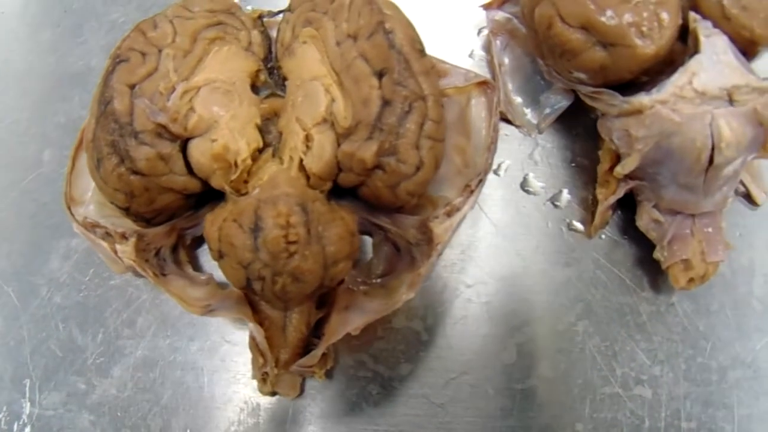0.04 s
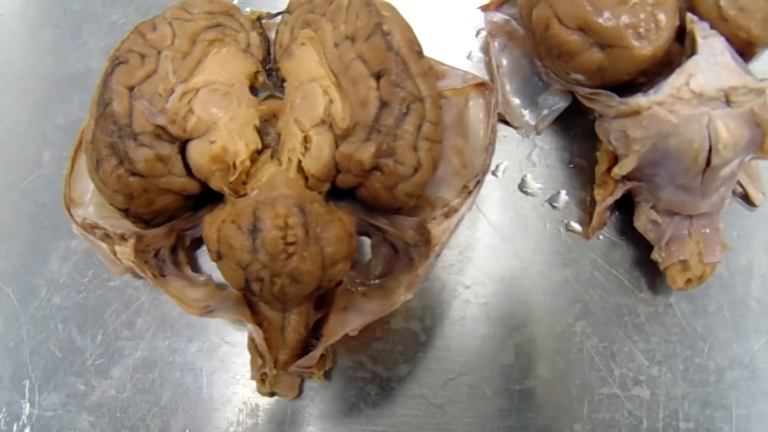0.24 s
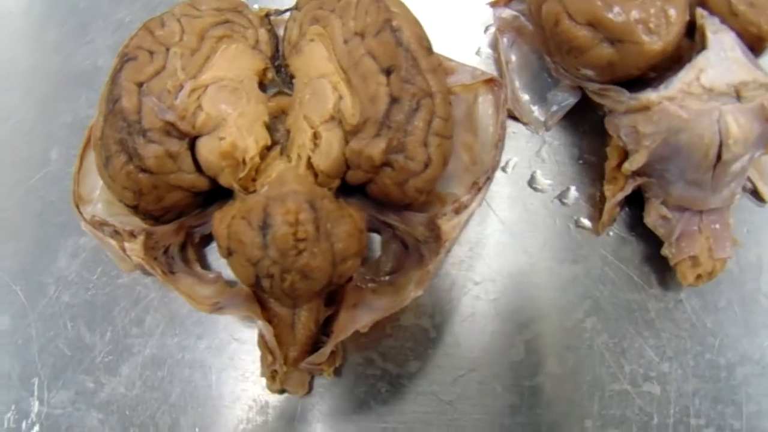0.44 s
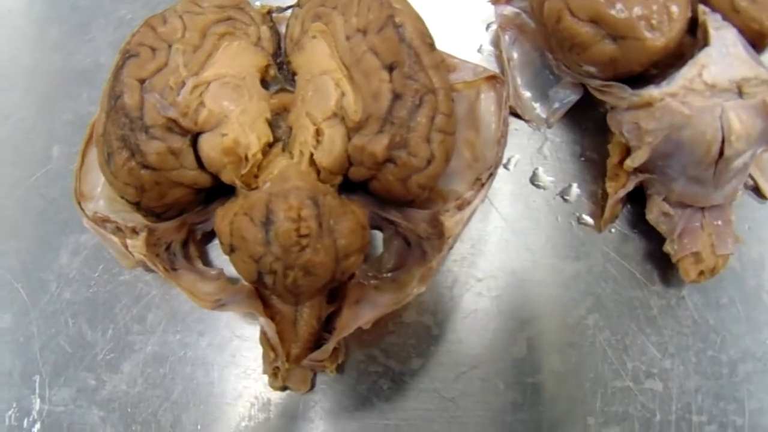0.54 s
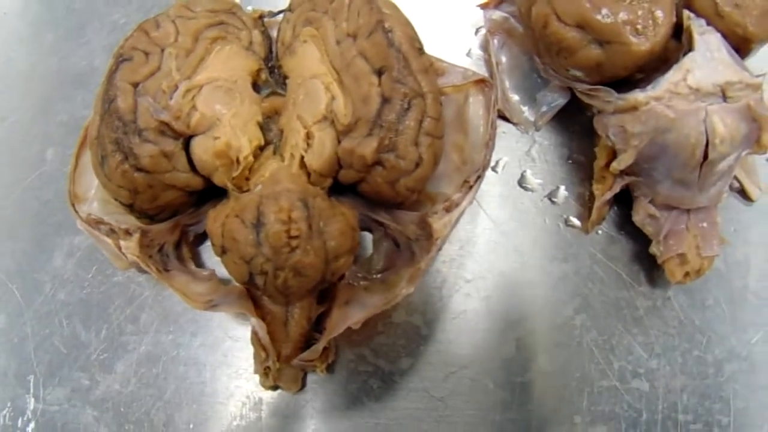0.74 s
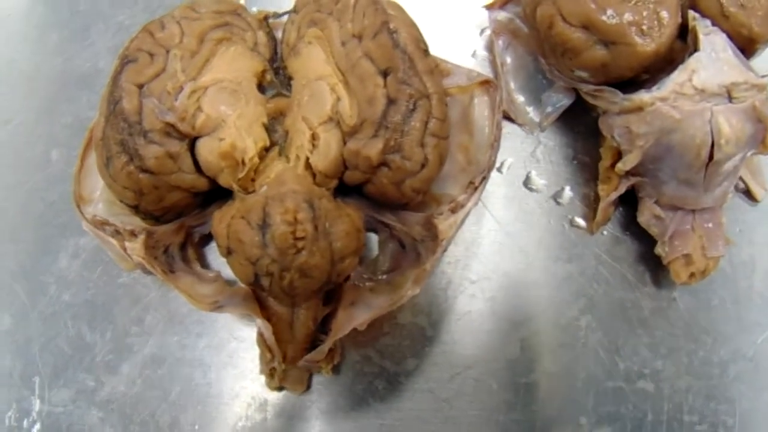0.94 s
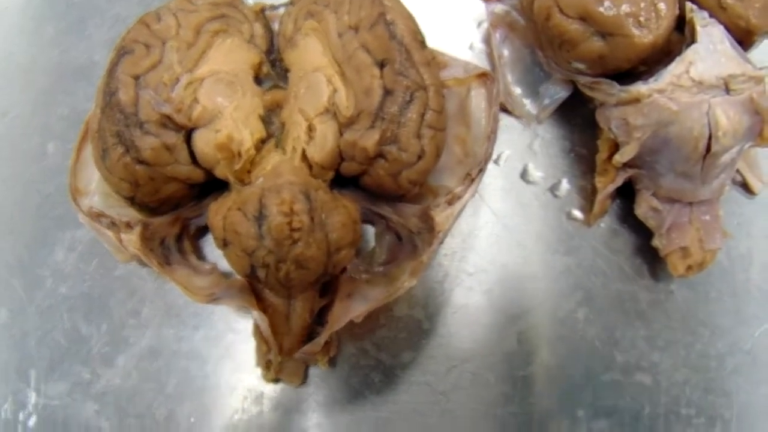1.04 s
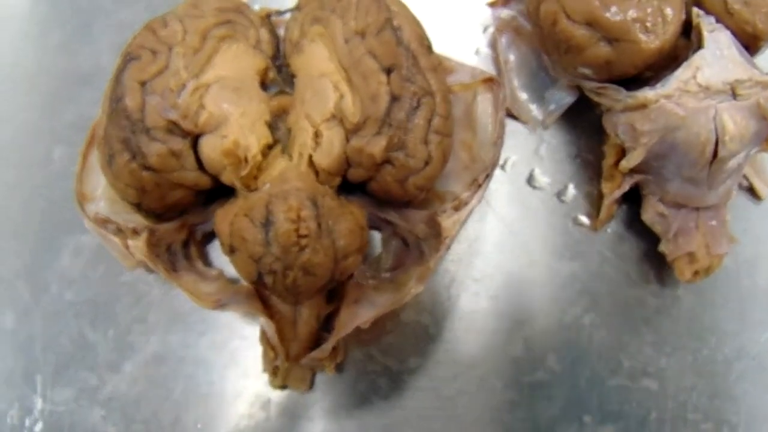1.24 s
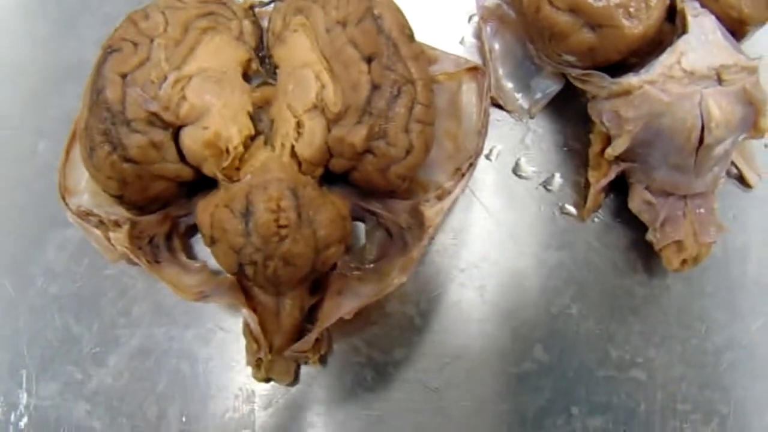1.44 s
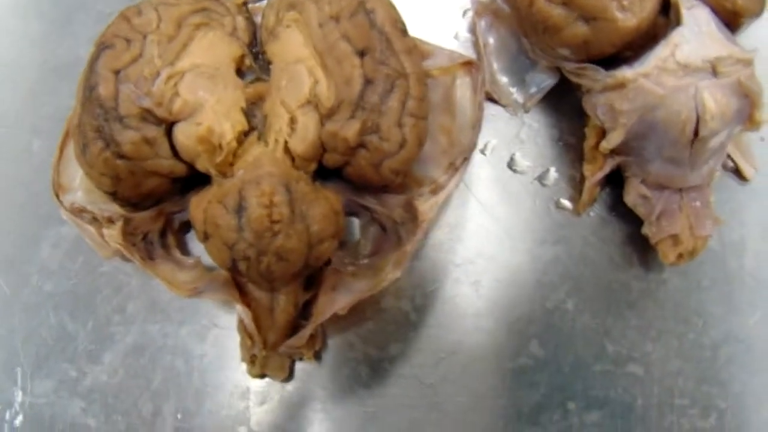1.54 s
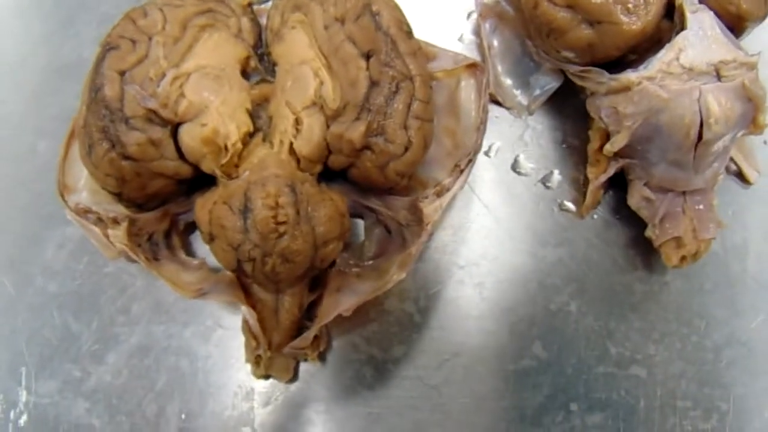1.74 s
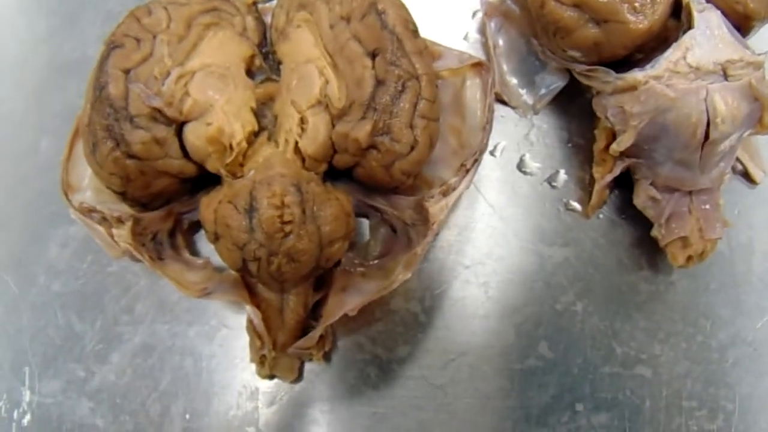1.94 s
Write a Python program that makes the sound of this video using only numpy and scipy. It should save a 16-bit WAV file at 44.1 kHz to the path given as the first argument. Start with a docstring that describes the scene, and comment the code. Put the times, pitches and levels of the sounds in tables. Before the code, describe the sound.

A small steel tool lands on a metal tray at about 0.2 seconds with one sharp clink, ringing high over a damped clank and rattling briefly. A dull knock follows at 0.4 seconds as the ring fades. Faint wet ticks and rubbing of handled tissue come around 0.8 to 1.6 seconds. A low ventilation hum fills the quiet lab room throughout the two seconds.

```python
"""Steel tool set down on a tray.

A small tool lands on a loaded metal tray in a lab: one sharp clink, a brief rattle, a dull knock.
The tool rings at two high pitches, the damped tray clanks below it and the room answers.
Faint wet ticks and rubbing follow as soft tissue is handled, over the hum of ventilation."""
import sys
import numpy as np
from scipy import signal
from scipy.fft import rfft, irfft
from scipy.io import wavfile

SR = 44100
rng = np.random.default_rng(int(sys.argv[2]) if len(sys.argv) > 2 else 0)


def waveform_to_disk(signal):
    """Save audio, clipped to [-1, 1], as 16-bit WAV at the path in sys.argv[1]."""
    frames = np.transpose(np.atleast_2d(signal))
    scaled = np.clip(frames, -1, 1) * 32767
    samples = np.round(scaled).astype(np.int16)
    wavfile.write(sys.argv[1], SR, samples)


N = 88200


def undb(db):
    """Decibels to gain."""
    return 10 ** (np.asarray(db) / 20)


def unit(x):
    """Scale to rms 1."""
    return x / np.sqrt(np.mean(x ** 2))


def clock():
    """Sample times in s."""
    return np.arange(N) / SR


def colour(x, points, tilt_db_oct=0):
    """Filter by (f/Hz, level/dB) points and a tilt."""
    hz, db = np.array(points, float).T
    octave = np.log2(np.maximum(np.fft.rfftfreq(N, 1 / SR), 1))
    gain_db = np.interp(octave, np.log2(hz), db) + tilt_db_oct * octave
    return irfft(rfft(x) * undb(gain_db), N)


def noise(points, tilt_db_oct=0):
    """Coloured noise of rms 1."""
    return unit(colour(rng.standard_normal(N), points, tilt_db_oct))


def fade(t60_s):
    """Exponential decay."""
    return np.exp(-np.log(1000) * clock() / max(t60_s, 1 / SR))


def rise(tau_s):
    """Exponential onset."""
    return 1 - np.exp(-clock() / tau_s)


def at(x, start_s):
    """Delay a sound to its start time."""
    return np.concatenate([np.zeros(int(start_s * SR)), x])[:N]


def ring(modes):
    """Decaying modes that start together from rest."""
    return sum(undb(db) * np.sin(2 * np.pi * hz * clock()) * fade(t60_s) for hz, db, t60_s in modes)


# air rush spectrum: f/Hz, level/dB
AIR_SPECTRUM = [(12, -57), (20, -10.5), (85, -12.5), (112, -12.5), (140, -6), (286, -15.5), (443, -22),
                (706, -23.5), (787, -25), (928, -27), (1010, -27.5), (1090, -25.5), (1890, -35.5),
                (9030, -42.5), (14000, -43)]
# fan tones: f/Hz, width/Hz, level/dB
FAN_TONES = [(181.2, 11, -49), (239.6, 3.8, -55.5), (785, 4.2, -61.5), (859, 17, -67.5), (997, 13, -65)]


def ventilation(air_db=-44.5, steady_db=0.5, waver_db=-6.5):
    """Wavering fan tones over a steady rush of air."""
    out = undb(air_db) * noise(AIR_SPECTRUM)
    bins_hz = np.fft.rfftfreq(N, 1 / SR)
    for hz, width_hz, db in FAN_TONES:
        peak = 1 / (1 + ((bins_hz - hz) / width_hz) ** 2)
        waver = unit(irfft(rfft(rng.standard_normal(N)) * peak, N))
        steady = unit(np.sin(2 * np.pi * (hz * clock() + rng.random())))
        out += undb(db) * (undb(steady_db) * steady + undb(waver_db) * waver)
    return out


# main hum envelope: t/s, level/dB
HUM_ENVELOPE = [(0.0, -37.5), (0.08, -36.5), (0.1, -43), (0.26, -36.5), (0.32, -34), (0.36, -63),
                (0.38, -38), (0.43, -33.5), (0.48, -43.5), (0.67, -36), (0.9, -45.5), (0.93, -35.5),
                (1.1, -34.5), (1.15, -42), (1.2, -35.5), (1.24, -42.5), (1.36, -36), (1.4, -44.5),
                (1.45, -33.5), (1.49, -43.5), (1.57, -38), (1.64, -45.5), (1.74, -35), (1.84, -43),
                (1.89, -31.5), (1.94, -47), (1.97, -34), (2.0, -36.5)]


def hum(centre_hz=139.5, wander_hz=0.81, gain_db=-1):
    """The main hum swells and sinks while its pitch wanders slightly."""
    hz = centre_hz + wander_hz * noise([(4, 0), (16, -40), (100, -120)])
    tone = unit(np.sin(2 * np.pi * np.cumsum(hz) / SR))
    times_s, db = np.array(HUM_ENVELOPE).T
    return undb(gain_db + np.interp(clock(), times_s, db)) * tone


# wet ticks: t/s, level/dB, tilt/(dB/oct)
WET_TICKS = [(0.7703, -43, 2), (0.7836, -47.5, 0), (0.7930, -50, -2), (0.894, -47, 4), (0.9100, -36.5, -2),
             (0.9210, -48, 11), (1.4659, -34.5, 1), (1.5346, -45, 1), (1.559, -50, 3)]
# wet tick spectrum: f/Hz, level/dB
WET_SPECTRUM = [(300, -20), (1800, -13), (2300, -5), (2900, 10.5), (3600, -13), (4600, 0.5), (6500, -7.5),
                (9000, -14), (14000, -19)]
# rubbing strokes: centre t/s, half length/s, level/dB, tilt/(dB/oct)
RUB_STROKES = [(0.102, 0.19, -54, -5), (0.787, 0.016, -57.5, -6), (1.168, 0.04, -56.5, -5),
               (1.28, 0.067, -58, -4.5), (1.38, 0.05, -51.5, -1.5), (1.556, 0.15, -52.5, -6)]
# rubbing spectrum: f/Hz, level/dB
RUB_SPECTRUM = [(500, -36), (2000, -7.5), (4500, 0), (6500, -0.5), (9000, 0.5), (14000, 1.5)]


def tissue():
    """Wet tissue ticks as it parts and hisses faintly as it is rubbed."""
    out = np.zeros(N)
    for start_s, db, tilt_db_oct in WET_TICKS:
        tick = noise(WET_SPECTRUM, tilt_db_oct) * fade(t60_s=0.0094)
        out += undb(db) * at(tick, start_s)
    for centre_s, half_s, db, tilt_db_oct in RUB_STROKES:
        stroke = np.exp(-((clock() - centre_s) / half_s) ** 2)
        out += undb(db) * noise(RUB_SPECTRUM, tilt_db_oct) * stroke
    return out


# dull knock spectrum: f/Hz, level/dB
KNOCK_SPECTRUM = [(120, -12), (300, -10), (750, 4.5), (1200, -5.5), (1800, -1.5), (2700, -12), (3600, -19),
                  (12000, -65)]
# soft contact filter: f/Hz, level/dB
SOFT_CONTACT = [(800, 3), (2000, -17), (4000, -23), (12000, -60)]


def knock(start_s=0.3885, thud_db=-28, body_db=-28):
    """A softer contact that moves only the low modes of the tray."""
    thud = noise(KNOCK_SPECTRUM) * fade(t60_s=0.072) * rise(tau_s=0.0027)
    body = colour(at(ring(TRAY_MODES), start_s), SOFT_CONTACT)
    return undb(thud_db) * at(thud, start_s) + undb(body_db) * body


# main tray modes: f/Hz, level/dB, t60/s
TRAY_MODES = [(697, -32, .37), (719, -33, .37), (781, -33, .3), (982, -31, .24), (1065, -28, .28),
              (1167, -28, .19), (1231, -24, .18), (1321, -35, .28), (1490, -35, .25), (1525, -28, .09),
              (1841, -36, .3), (2331, -31, .15), (3350, -27, .07), (3630, -31, .08), (4650, -24, .05),
              (5123, -33, .17)]
# tool-tray contacts: t/s, ring level/dB, clank level/dB, tick level/dB
CONTACTS = [(0.2208, 0.5, 0, 1), (0.2232, -20, -7, -2.5), (0.2677, -15.5, -6.5, -25),
            (0.2716, -22, -12, -8), (0.288, -26.5, -15, -10.5), (0.3060, -26, -17.5, -18.5)]


def tray(gain_db=-2):
    """The first contact strikes the main modes of the tray; each later one adds to their swing."""
    elapsed_s = clock() - CONTACTS[0][0]
    out = np.zeros(N)
    for hz, db, t60_s in TRAY_MODES:
        swing = sum(undb(ring_db) * at(fade(t60_s), start_s) for start_s, ring_db, _, _ in CONTACTS)
        out += undb(db) * np.sin(2 * np.pi * hz * elapsed_s) * swing
    return undb(gain_db) * out


# spectrum of the weak tray modes: f/Hz, level/dB
CLANK_SPECTRUM = [(50, -52), (120, -22.5), (250, -3.5), (550, -4), (1200, -2), (2400, -6.5), (2750, -11),
                  (3500, -11), (5800, -20), (14000, -13)]
# steel-on-steel tick spectrum: f/Hz, level/dB
TICK_SPECTRUM = [(500, -60), (4000, -6), (7000, -7.5), (9400, -11), (10300, 0.5), (11800, 3), (13200, -1),
                 (14200, 1.5)]
# first swings under the contact point: f/Hz, level/dB, t60/s
SNAP_MODES = [(11000, -7, 0.002), (1160, -19, 0.034)]


def clink(clank_gain_db=-18, tick_gain_db=-13.5):
    """Each contact snaps, ticks and stirs the crowd of weak tray modes."""
    snap = ring(SNAP_MODES)
    out = np.zeros(N)
    for start_s, _, clank_db, tick_db in CONTACTS:
        clank = undb(clank_gain_db) * noise(CLANK_SPECTRUM) * fade(t60_s=0.071)
        tick = undb(tick_gain_db) * noise(TICK_SPECTRUM) * fade(t60_s=0.022)
        out += at(undb(clank_db) * clank + undb(tick_db) * (tick + snap), start_s)
    return out


# tool modes: f/Hz, level/dB, t60/s
TOOL_MODES = [(8208, -16, .22), (8228, -29, .56), (8371, -37, .2), (12511, -23, .34), (12536, -30, .46),
              (12600, -36, .28)]


def tool(start_s=0.2212, gain_db=0.5):
    """The first landing sets the tool ringing; close pairs of modes beat."""
    return undb(gain_db) * at(ring(TOOL_MODES) * rise(tau_s=0.0012), start_s)


# room echo response: f/Hz, level/dB
ROOM_RESPONSE = [(100, 10), (1000, -6.5), (3000, -7), (7000, 3), (8200, 4.5), (9500, -6), (14000, -3)]


def room(x, echo_db):
    """Dense reflections that build up quickly and die away."""
    tail = rng.standard_normal(N) * fade(t60_s=0.47) * rise(tau_s=0.004)
    echo = signal.fftconvolve(colour(x, ROOM_RESPONSE), tail / np.linalg.norm(tail))[:N]
    return x + undb(echo_db) * echo


def scene():
    """Tool, tray and tissue in the humming room, mono."""
    metal = room(clink(), echo_db=-4) + room(tool(), echo_db=-15) + room(tray(), echo_db=-11)
    soft = room(knock(), echo_db=-8) + room(tissue(), echo_db=-16)
    return (metal + soft + ventilation() + hum())[None]


def record(dry, low_cut_hz=56, high_cut_hz=14250):
    """Thin the deep bass and cut the top."""
    highpass = signal.butter(2, low_cut_hz, "high", fs=SR, output="sos")
    lowpass = signal.firwin(601, high_cut_hz, window="blackman", fs=SR)
    return signal.fftconvolve(signal.sosfilt(highpass, dry), lowpass[None], "same")


dry = scene()
out = record(dry)
waveform_to_disk(out)
```